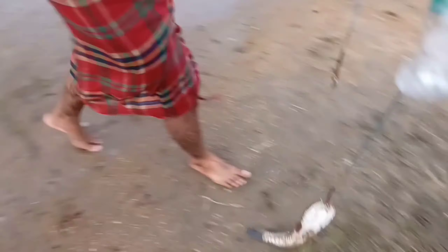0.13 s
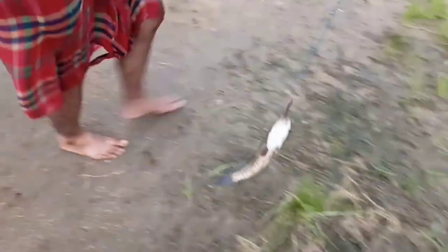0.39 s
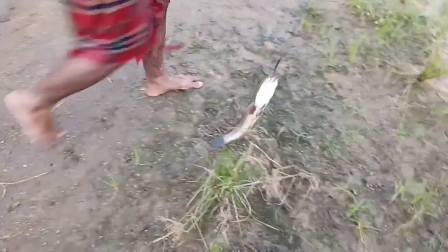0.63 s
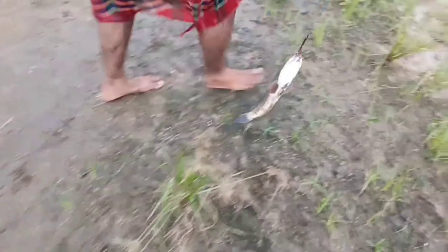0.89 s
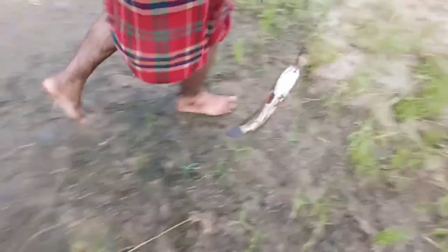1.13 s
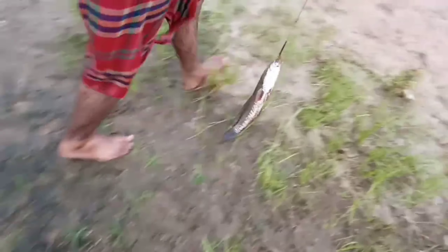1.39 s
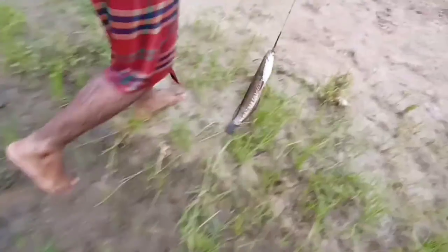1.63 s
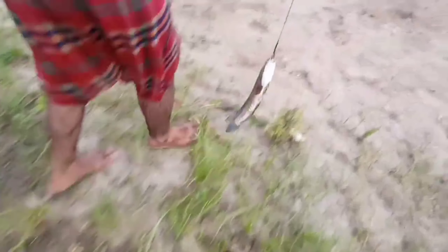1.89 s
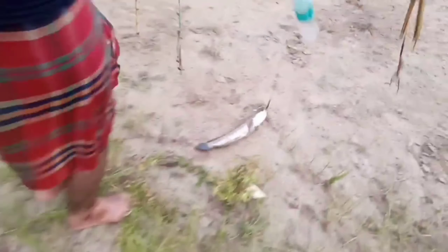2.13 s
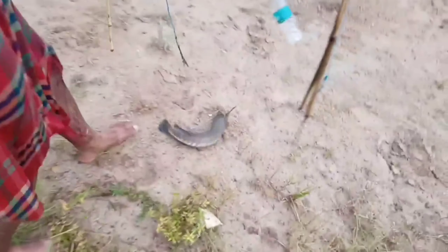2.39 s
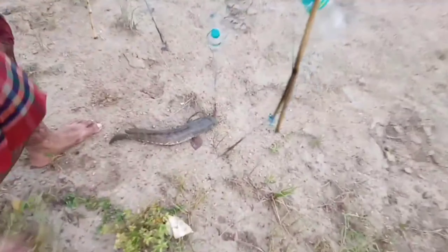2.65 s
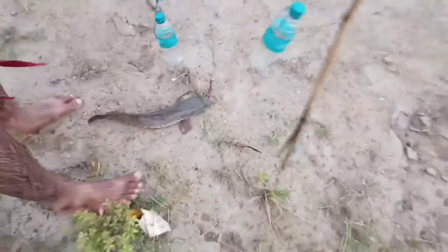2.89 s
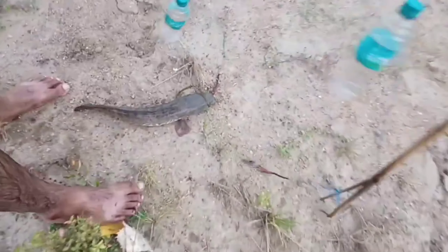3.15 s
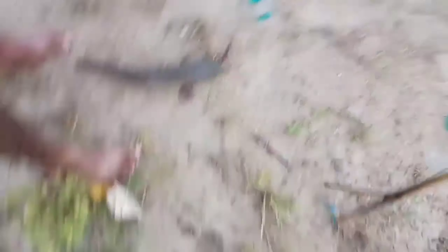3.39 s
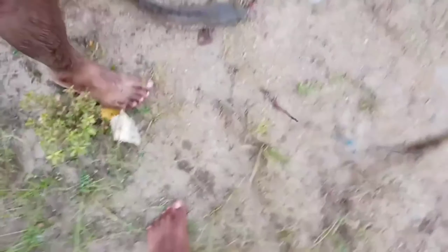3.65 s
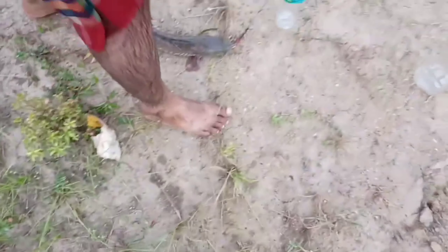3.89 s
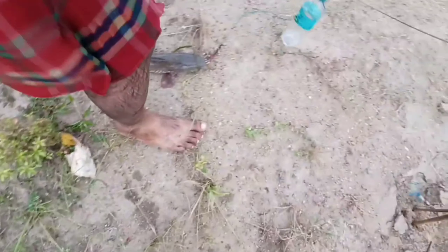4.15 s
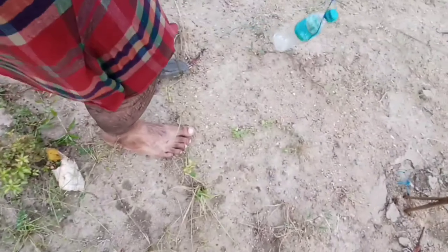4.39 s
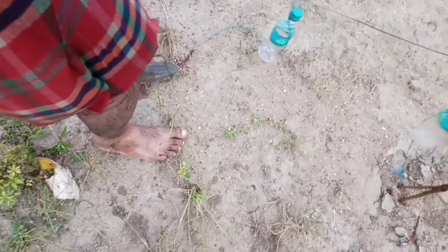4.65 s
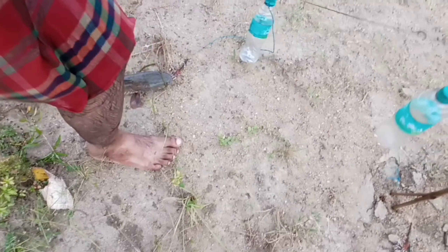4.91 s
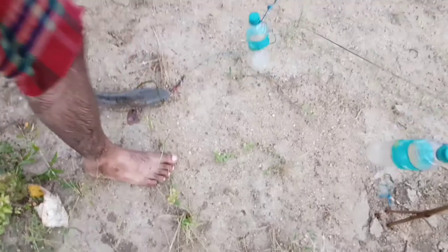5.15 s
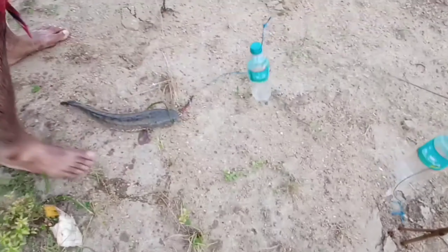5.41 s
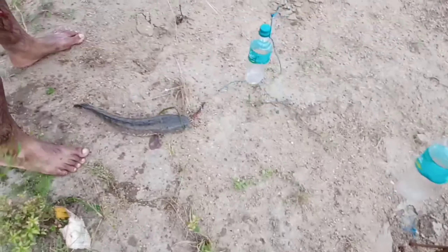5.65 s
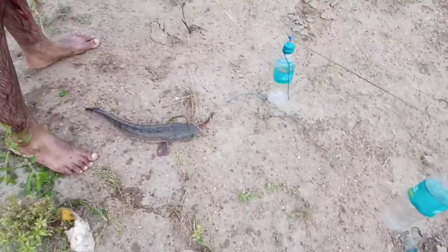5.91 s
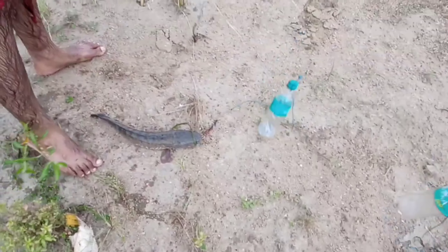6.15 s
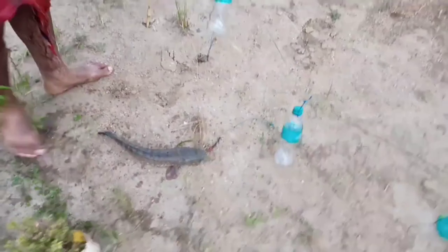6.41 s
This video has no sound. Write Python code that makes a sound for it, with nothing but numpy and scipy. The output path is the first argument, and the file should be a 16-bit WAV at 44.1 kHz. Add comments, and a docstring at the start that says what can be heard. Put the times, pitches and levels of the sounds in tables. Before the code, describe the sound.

Faint open-air hush with low handling rumble and a line dragging over damp sand. Barefoot steps make short gritty scuffs with crackling stalks. Empty plastic bottles rattle hollowly, mostly from the middle on, after one quick rising scrape. One sharp crack near the microphone dominates everything. Heavier crunchy scuffs follow just after four seconds and again after five and a half, with quiet gaps between. Tiny birds whistle far off early on.

```python
"""Throughout: faint outdoor hush, low rumble of air and handling, a line dragged over damp sand and grass.
From the start bare feet scuff the bank: shaped noise grains, with cracking grains and stalks as short bursts.
From 0.16 s empty plastic bottle floats knock: noise contacts ring hollow modes. Far birds, gliding sines, 0.4-2 s.
At 2.2 s a bottle scrapes in rising narrow noise; at 3.4 s one sharp snap, decaying sines, lands close to the mic."""
import sys
import numpy as np
from scipy import signal
from scipy.fft import rfft, irfft, next_fast_len
from scipy.io import wavfile
from scipy.ndimage import uniform_filter1d, map_coordinates

SR = 44100
rng = np.random.default_rng(int(sys.argv[2]) if len(sys.argv) > 2 else 0)


def undo_db(level):
    """Turn decibels back into plain size, where 20 dB means ten times bigger."""
    steps = np.asarray(level, float) / 20
    return 10 ** steps


def dump_mix(stems):
    """Bounce the given channels to the path in sys.argv[1] as a 16-bit WAV at rate SR."""
    frames = np.atleast_2d(stems).T  # one column per channel
    limited = np.clip(frames, -1, 1)  # hard clip at full scale
    pcm = np.round(limited * 32767).astype(np.int16)
    wavfile.write(sys.argv[1], SR, pcm)


N = 287962

# air and handling at the microphone: time_s, level_db
BUFFET_LEVEL = [(0, -63), (.38, -57), (.52, -66), (.74, -59), (.86, -67), (1.9, -68), (2.25, -58),
                (2.55, -66), (3.45, -58), (3.75, -64), (4.55, -59), (5, -72), (5.36, -69), (5.85, -56),
                (6.1, -71), (6.22, -74), (6.33, -53), (6.53, -60)]
# line dragged over the ground: time_s, level_db
HAUL_LEVEL = [(0, -61), (.37, -62), (.5, -67), (.75, -65), (.9, -72), (1.95, -68), (2.25, -57), (2.55, -64),
              (2.9, -59), (3.15, -62), (3.7, -57), (4, -61), (4.33, -50), (4.46, -54), (4.51, -67),
              (4.64, -60), (4.85, -68), (5.3, -70), (5.65, -55), (5.85, -58), (6.05, -77), (6.23, -74),
              (6.35, -62), (6.53, -65)]
# restless shuffling under the scuffs: time_s, level_db, ground_coarseness_db
SHUFFLE_LEVEL = [(0.0, -56, -9), (0.3, -56, -8), (0.48, -65, -12), (0.85, -71.5, -11), (1.45, -70.5, -13),
                 (2.0, -65.5, -9), (2.8, -60, -9), (3.45, -56, -5), (3.7, -54, -8), (4.04, -64.5, -9),
                 (4.14, -50, -8), (4.44, -58, -8), (4.52, -68.5, -6), (4.75, -68.5, -4), (5.0, -72.5, -11),
                 (5.36, -71.5, -12), (5.55, -52, -11), (5.93, -55, -13), (6.0, -72.5, -13),
                 (6.21, -83.5, -7), (6.28, -79.5, -3), (6.53, -68.5, -11)]
# scuffs of bare feet on sand and grass: start_s, length_s, peak_level_db, peak_place_0_to_1, fizz_over_hiss_db
FOOT_SCUFFS = [(0.035, 0.13, -51, 0.38, -4), (0.163, 0.126, -47, 0.21, -5), (0.43, 0.05, -59, 0.2, 0),
               (0.55, 0.032, -38, 0, -6), (0.575, 0.06, -48, 0.5, -5), (0.604, 0.212, -53, 0.06, -6),
               (0.941, 0.19, -66, 0.26, -7), (1.081, 0.148, -66, 0.05, -5), (1.16, 0.016, -60, 0.5, 0),
               (1.206, 0.148, -69, 0.05, -9), (1.28, 0.176, -67, 0.2, -7), (1.499, 0.028, -45, 0.5, -8),
               (1.525, 0.06, -57, 0, -6), (1.621, 0.118, -63, 0.85, -4), (1.825, 0.104, -63, 0.96, 2),
               (2.005, 0.2, -53, 0.02, -5), (2.2, 0.03, -54, 0.9, -4), (2.231, 0.21, -48, 0, -5),
               (2.302, 0.012, -48, 0.33, -7), (2.433, 0.044, -50, 0.59, -7), (2.529, 0.024, -54, 0.5, -8),
               (2.587, 0.026, -59, 0.31, -2), (2.64, 0.04, -52, 0.85, -6), (2.707, 0.116, -55, 0.69, -1),
               (2.831, 0.165, -51, 0.39, -2), (2.847, 0.016, -35, 0.5, -10), (3.078, 0.076, -56, 0.34, 1),
               (3.158, 0.016, -47, 0.5, -10), (3.224, 0.076, -55, 0.34, 2), (3.351, 0.03, -43, 0.4, -10),
               (3.395, 0.038, -47, 0.32, -4), (3.427, 0.024, -46, 0.5, 0), (3.477, 0.03, -45, 0.5, -3),
               (3.515, 0.062, -53, 0.81, -1), (3.602, 0.03, -45, 0, -10), (3.635, 0.02, -43, 0.6, -9),
               (3.655, 0.07, -50, 0.3, -6), (3.74, 0.08, -49, 0.05, -5), (3.832, 0.036, -46, 0.5, -2),
               (3.882, 0.18, -51, 0.44, -1), (4.058, 0.112, -34, 0.45, -7), (4.176, 0.012, -41, 0.3, -10),
               (4.194, 0.036, -34, 0.3, -7), (4.24, 0.035, -45, 0.5, -6), (4.284, 0.05, -34, 0.4, -6),
               (4.325, 0.04, -31, 0.55, -6), (4.378, 0.024, -41, 0.4, -7), (4.423, 0.038, -30, 0.68, -6),
               (4.465, 0.047, -49, 0.6, -3), (4.541, 0.012, -42, 0, -7), (4.565, 0.16, -54, 0.4, -10),
               (4.708, 0.036, -56, 0.5, -13), (4.786, 0.08, -65, 0.0, -16), (4.89, 0.088, -66, 0.91, -16),
               (5.109, 0.18, -65, 0.44, -12), (5.35, 0.02, -60, 0, -8), (5.38, 0.084, -49, 0.02, -4),
               (5.419, 0.044, -48, 0.59, -3), (5.49, 0.12, -42, 0.65, -2), (5.625, 0.067, -30, 0.65, -12),
               (5.697, 0.045, -41, 0.5, -5), (5.745, 0.07, -44, 0.7, -1), (5.8, 0.088, -35, 0.45, 2),
               (5.908, 0.055, -38, 0.15, 0), (5.955, 0.035, -52, 0, -8), (6.004, 0.03, -66, 0, -8),
               (6.237, 0.106, -62, 0.25, -9), (6.305, 0.208, -64, 0.04, -6), (6.357, 0.077, -61, 0.16, -11),
               (6.428, 0.065, -56, 0.0, -12)]
# single grains and stalks cracking: start_s, peak_db (before colouring)
CRACK_TICKS = [(0.0432, -34), (0.2304, -31), (0.5505, -24), (0.5634, -26), (0.99, -47), (1.089, -46),
               (1.1642, -43), (1.5039, -35), (1.625, -49), (1.706, -42), (2.2337, -27), (2.5385, -33),
               (2.6722, -33), (2.76, -36), (2.8498, -22), (2.895, -33), (3.1333, -32), (3.1596, -30),
               (3.3572, -24), (3.4425, -22), (3.5658, -32), (3.6036, -26), (4.0736, -22), (4.1788, -21),
               (4.2052, -19), (4.3869, -25), (4.5415, -25), (4.6083, -30), (5.3541, -43), (5.5667, -24),
               (5.7753, -25), (5.9209, -19), (6.0061, -50), (6.208, -52), (6.259, -41), (6.319, -42),
               (6.3948, -40), (6.4312, -39)]
# bottle knocks: start_s, hollow_boom_db, wall_ring_db, hard_contact_over_wall_db, base_t60_s
BOTTLE_KNOCKS = [(.157, -46, -61, 6, .04), (1.243, -47, -52, -1, .07), (2.095, -58, -54, -5, .06),
                 (2.501, -63, -58, 0, .11), (2.623, -60, -55, -4, .04), (2.671, -47, -56, -1, .05),
                 (2.849, -36, -29, 2, .1), (2.933, -55, -42, -9, .1), (2.963, -45, -38, -3, .07),
                 (3.032, -40, -53, -1, .05), (3.158, -51, -57, 10, .06), (3.191, -47, -58, 2, .04),
                 (3.241, -37, -38, -6, .06), (3.353, -35, -33, 7, .13), (3.433, -53, -41, 0, .08),
                 (3.482, -45, -53, 12, .06), (3.602, -39, -35, 7, .09), (3.638, -45, -36, 5, .13),
                 (3.658, -49, -34, -7, .13), (3.782, -46, -43, -2, .07), (4.134, -44, -50, 8, .06),
                 (4.204, -42, -51, 8, .06), (4.288, -46, -53, 11, .06), (4.33, -39, -40, 5, .06),
                 (4.44, -39, -49, 8, .06), (4.543, -31, -26, -7, .1), (4.608, -35, -38, -2, .07),
                 (4.619, -40, -50, 6, .27), (4.658, -53, -52, 8, .13), (4.743, -61, -48, -1, .07),
                 (5.31, -47, -52, -4, .05), (5.707, -46, -42, -6, .06), (6.202, -72, -55, -8, .08),
                 (6.259, -51, -36, -9, .1), (6.317, -55, -48, 7, .11), (6.43, -38, -33, -3, .09)]
# bottle modes: frequency_hz, relative_db, share_of_knock_t60, group_index
BOTTLE_MODES = [(165, -9, .8, 0), (214, 0, 1.25, 0), (262, -5, .7, 0), (310, -5, .7, 1), (368, 0, 1.1, 1),
                (440, -5, .7, 1), (570, 0, 1.1, 2), (638, 0, .9, 3), (720, -8, .5, 3), (830, -8, .45, 3),
                (1000, -1, .17, 4), (1250, 0, .2, 4), (1560, 0, .3, 4), (1950, -1, .16, 4),
                (2270, -1, .16, 4), (2750, -4, .14, 4), (3250, -5, .14, 4)]
# bird whistles: start_s, end_s, start_hz, end_hz, level_db (before wavering)
BIRD_WHISTLES = [(.4, .45, 2700, 2550, -72), (.56, .61, 2680, 2550, -69), (.82, .86, 4900, 4400, -73),
                 (.88, .91, 5000, 4500, -73), (1.53, 1.66, 4900, 3750, -70),
                 (1.665, 1.695, 5350, 4950, -65), (1.72, 1.76, 4900, 4500, -71),
                 (1.78, 1.8, 4900, 5000, -67), (1.935, 1.965, 4600, 4500, -68),
                 (1.945, 1.99, 5350, 5250, -68)]
# dragged bottle resonances: start_s, end_s, start_hz, end_hz, width_hz, level_db
BOTTLE_SCRAPES = [(2.26, 2.354, 250, 750, 250, -50), (2.23, 2.354, 700, 950, 600, -50),
                  (2.23, 2.354, 1300, 1540, 600, -52), (2.23, 2.354, 2300, 2500, 1400, -58)]

# microphone port colour, two resonances: frequency_hz, gain_db
PORT_GAIN = [(1000, 0), (4500, 0), (6200, 2), (7400, 8), (8800, 3), (10200, -4), (12300, -3), (14400, 3),
             (15700, -2)]
# source spectra, relative: frequency_hz, density_db_per_hz
RUMBLE_SPECTRUM = [(15, -30), (35, -8), (60, 0), (150, -1), (220, -12), (500, -45)]
DRAG_SPECTRUM = [(120, -25), (200, 0), (350, 0), (650, -3), (950, -11), (1700, -24)]
HUSH_SPECTRUM = [(300, -20), (700, -2), (1200, -3), (2000, -7), (6600, -12), (7500, -6), (8800, -7),
                 (9800, -13), (16000, -13)]
CRUNCH_SPECTRUM = [(600, -28), (1100, -10), (1600, -4), (2600, 0), (3400, -1), (4300, -20)]
HISS_SPECTRUM = [(2700, -22), (3700, 0), (5200, 1), (7400, -2), (9300, 0), (10600, -20)]
FIZZ_SPECTRUM = [(9000, -22), (10200, 1), (13500, 0), (16000, 0)]

MIC_TOP_HZ = 15800
HUSH_DB = -74
SCUFF_ENDS_DB, SCUFF_ROUND = -10, 1.5  # both ends re peak; 1 = pointed peak, 2 = round
CRUNCH_EXPONENT, QUIET_DB = .87, -60  # crunch grows more slowly than hiss above a quiet scuff
SHUFFLE_FIZZ_DB = -7  # re shuffle hiss
LOWER_WALL_DB = -9  # weaker of the two wall groups
UPPER_BOOM_DB, UPPER_BOOM_DB_PER_S = 6, -70  # longer ring: lowest modes lead more


def unit(x):
    """Scale to rms 1."""
    return x / np.sqrt(np.mean(x ** 2) + 1e-20)


def along(points, hz):
    """Read (frequency_hz, value) points on a log frequency axis."""
    point_hz, value = np.transpose(points)
    return np.interp(np.log(hz + 1), np.log(point_hz + 1), value)


def curves(rows):
    """One value per sample for each column after the time."""
    time_s, *columns = np.transpose(rows)
    return [np.interp(np.arange(N) / SR, time_s, column) for column in columns]


def wobble(knots_per_s):
    """Smooth random curve through normal knots."""
    knots = rng.standard_normal(int(N * knots_per_s / SR) + 4)
    return map_coordinates(knots, [np.arange(N) * knots_per_s / SR])


def coloured(x, spectrum):
    """Filter x by a spectrum, the microphone port and its band limit."""
    size = next_fast_len(N + 8192)
    hz = np.fft.rfftfreq(size, 1 / SR)
    gain = undo_db(along(spectrum, hz) + along(PORT_GAIN, hz)) * (hz < MIC_TOP_HZ)
    return irfft(rfft(x, size) * gain, size)[:N]


def air():
    """Lumpy low rumble, dragging over the ground and far hush, each from coloured noise."""
    (rumble_db,), (drag_db,) = curves(BUFFET_LEVEL), curves(HAUL_LEVEL)
    rumble = undo_db(2.2 * wobble(9)) * coloured(rng.standard_normal(N), RUMBLE_SPECTRUM)
    drag_lumps = undo_db(2.2 * wobble(8) + 3.5 * wobble(30))
    drag = drag_lumps * coloured(rng.standard_normal(N), DRAG_SPECTRUM)
    hush = coloured(rng.standard_normal(N), HUSH_SPECTRUM)
    return undo_db(rumble_db) * unit(rumble) + undo_db(drag_db) * unit(drag) + undo_db(HUSH_DB) * unit(hush)


def grit(spread_db, patchy_db, snap_db):
    """Dense grains of unequal size, larger snaps, and patches of random gain in time and pitch."""
    snaps = rng.random(N) < 40 / SR  # about 40 a second
    sizes = undo_db(spread_db * rng.exponential(size=N)) + undo_db(snap_db) * snaps
    bins = signal.stft(rng.standard_normal(N) * sizes, nperseg=256)[2]
    field = uniform_filter1d(rng.standard_normal(bins.shape), 8, 0)
    field = uniform_filter1d(field, 5, 1)
    return signal.istft(bins * undo_db(patchy_db * unit(field)), nperseg=256)[1][:N]


def feet():
    """Scuffs set in at once, swell, fade and stop; the same grains sound as crunch, hiss and fizz."""
    shuffle_db, coarse_db = curves(SHUFFLE_LEVEL)
    hiss_power = undo_db(shuffle_db) ** 2
    fizz_power = undo_db(shuffle_db + SHUFFLE_FIZZ_DB) ** 2
    for start_s, length_s, peak_db, place, fizz_db in FOOT_SCUFFS:
        progress = np.linspace(0, 1, round(length_s * SR))
        place = np.clip(place, .001, .999)
        before, after = 1 - progress / place, (progress - place) / (1 - place)
        off_peak = np.where(progress < place, before, after)
        power = undo_db(peak_db + SCUFF_ENDS_DB * off_peak ** SCUFF_ROUND) ** 2
        hiss_power[round(start_s * SR):][:len(power)] += power
        fizz_power[round(start_s * SR):][:len(power)] += power * undo_db(fizz_db) ** 2
    slower_growth = (hiss_power / undo_db(QUIET_DB) ** 2) ** (CRUNCH_EXPONENT - 1)
    crunch_power = hiss_power * undo_db(coarse_db) ** 2 * slower_growth
    gains = uniform_filter1d(np.sqrt([crunch_power, hiss_power, fizz_power]), size=90, axis=1)
    grains = grit(spread_db=1.6, patchy_db=2.5, snap_db=19)
    clumps = undo_db(1.6 * wobble(35) + 1.4 * wobble(150))  # grains give way in clumps
    spectra = (CRUNCH_SPECTRUM, HISS_SPECTRUM, FIZZ_SPECTRUM)
    layers = np.array([unit(coloured(grains, spectrum)) for spectrum in spectra])
    return unit(clumps) * np.sum(gains * layers, axis=0)


def ticks():
    """A crack of a fraction of a millisecond with a short scatter behind it."""
    cracks, t = np.zeros(N + SR), np.arange(SR // 50) / SR
    envelope = undo_db(-60 * t / .0015) + .15 * undo_db(-60 * t / .015)  # t60 in s
    for start_s, peak_db in CRACK_TICKS:
        burst = rng.standard_normal(len(t)) * envelope
        cracks[round(start_s * SR):][:len(t)] += undo_db(peak_db) * burst / np.abs(burst).max()
    return coloured(cracks[:N], [(600, -22), (1800, -2), (5000, 0), (16000, -2)])


def bottles():
    """A short rattle of contacts rings hollow plastic modes, at new strengths and slightly detuned."""
    out, t = np.zeros(N + SR), np.arange(SR // 3) / SR
    hz, mode_db, t60_share, group = np.transpose(BOTTLE_MODES)[:, :, None]
    member = np.arange(5)[:, None] == group.T
    contact_s = np.arange(SR // 25) / SR
    for start_s, boom_db, wall_db, hard_db, t60_s in BOTTLE_KNOCKS:
        upper_boom_db = boom_db + UPPER_BOOM_DB + UPPER_BOOM_DB_PER_S * t60_s
        groups_db = np.array([boom_db, upper_boom_db, wall_db + LOWER_WALL_DB, wall_db, wall_db + hard_db])
        luck = rng.standard_normal((2, len(BOTTLE_MODES), 1))
        decay = undo_db(mode_db + 2.8 * luck[0] - 60 * t / (t60_s * t60_share))
        rings = decay * np.sin(2 * np.pi * hz * (1 + .015 * luck[1]) * t)
        rings = rings * (1 - np.exp(-hz * t / .4))  # soft wall takes part of a cycle to get going
        rattle = rng.standard_normal(len(contact_s)) * contact_s * np.exp(-contact_s / .003)
        groups = signal.fftconvolve(member @ rings, rattle[None], axes=1)[:, :len(t)]
        peaks = np.abs(groups).max(axis=1, keepdims=True)
        knock = np.sum(undo_db(groups_db)[:, None] * groups / peaks, axis=0)
        out[round(start_s * SR):][:len(t)] += knock
    return out[:N]


def birds():
    """Thin gliding sine whistles from far away, wavering in the air."""
    out = np.zeros(N)
    for start_s, end_s, start_hz, end_hz, level_db in BIRD_WHISTLES:
        n = round((end_s - start_s) * SR)
        phase = 2 * np.pi * np.cumsum(np.linspace(start_hz, end_hz, n)) / SR
        whistle = signal.windows.tukey(n, .5) * np.sin(phase)
        out[round(start_s * SR):][:n] += undo_db(level_db) * whistle
    return out * undo_db(2 * wobble(70))


def scrape():
    """A bottle dragged over the ground: rough narrow noise in rising resonances, stopping short."""
    out = np.zeros(N)
    for start_s, end_s, start_hz, end_hz, width_hz, level_db in BOTTLE_SCRAPES:
        n = round((end_s - start_s) * SR)
        progress = np.linspace(0, 1, n)
        phase = 2 * np.pi * np.cumsum(start_hz + (end_hz - start_hz) * progress) / SR
        stutter = wobble(width_hz)[:n] * np.sin(phase) + wobble(width_hz)[:n] * np.cos(phase)
        stroke = np.minimum(progress / .3, 1) * np.minimum((1 - progress) / .06, 1)
        out[round(start_s * SR):][:n] += undo_db(level_db) * stroke * unit(stutter)
    return out * unit(undo_db(4 * wobble(130)))  # sticks and slips


def snap():
    """A crack at the microphone, a short push of air, and the slow swing of the diaphragm after it."""
    t = np.arange(N) / SR - 3.40525
    after = np.clip(t, 0, None)
    crack = undo_db(-1.5) * np.exp(-np.abs(t) / .00007) * np.sin(2 * np.pi * 12500 * t)
    splinter = undo_db(-7) * np.exp(-np.abs(t) / .00014) * np.sin(2 * np.pi * 5200 * t)
    push = undo_db(-3) * np.sin(2 * np.pi * 850 * after) * np.exp(-after / .0004)
    swing_envelope = (1 - np.exp(-after / .003)) * np.exp(-(after / .014) ** 2)
    swing = undo_db(-21) * -np.sin(2 * np.pi * 98 * after) * swing_envelope
    return crack + splinter + push + swing


def scene():
    """Sum all sources in the open air, one channel."""
    return (air() + feet() + ticks() + bottles() + birds() + scrape() + snap())[None]


def top_cut(x):
    """Nothing passes above the cut-off."""
    return signal.sosfilt(signal.butter(12, 16470, fs=SR, output="sos"), x)


def record(dry):
    """Take the finished mix down in the hand-held camera."""
    return top_cut(dry)


dry = scene()
out = record(dry)
dump_mix(out)
```